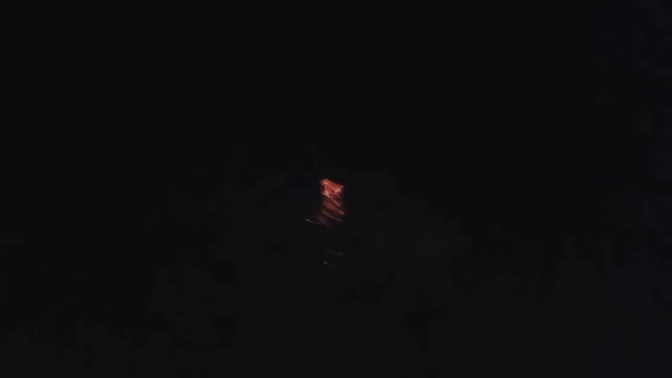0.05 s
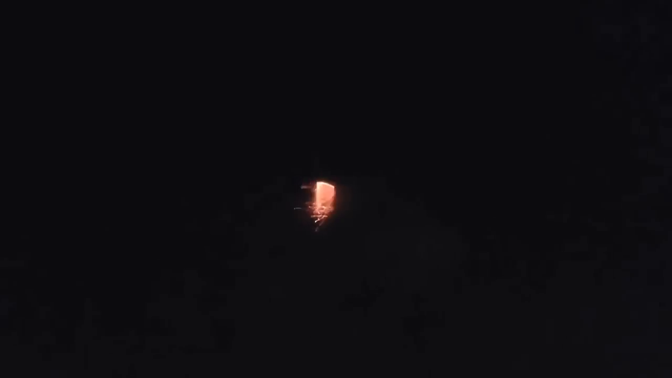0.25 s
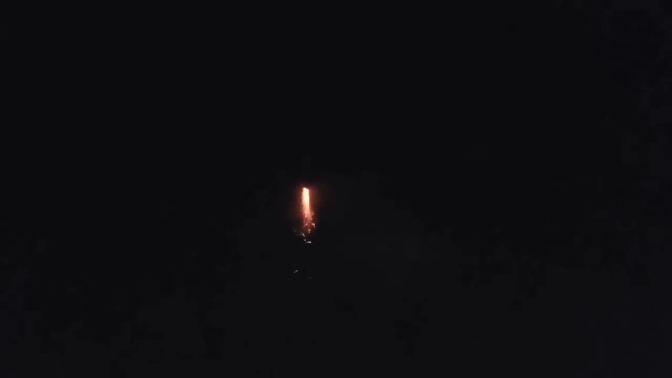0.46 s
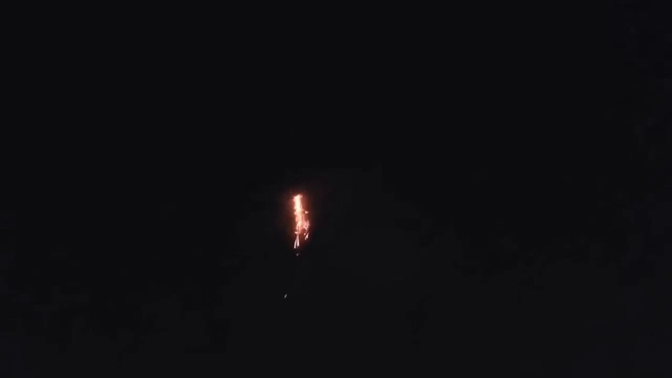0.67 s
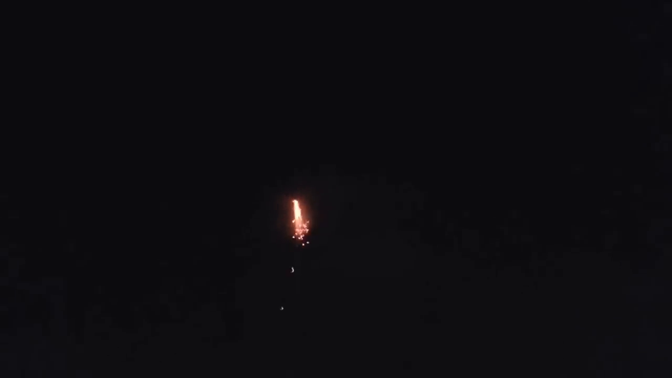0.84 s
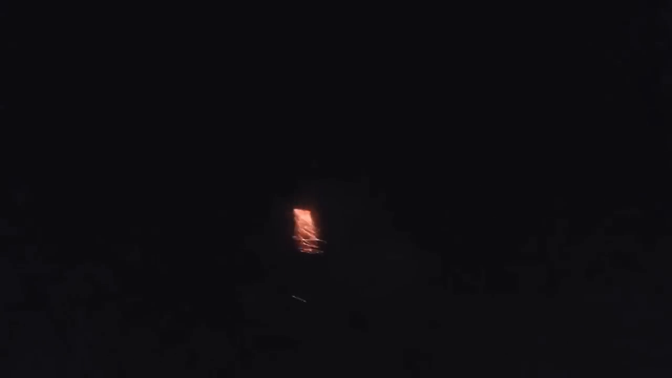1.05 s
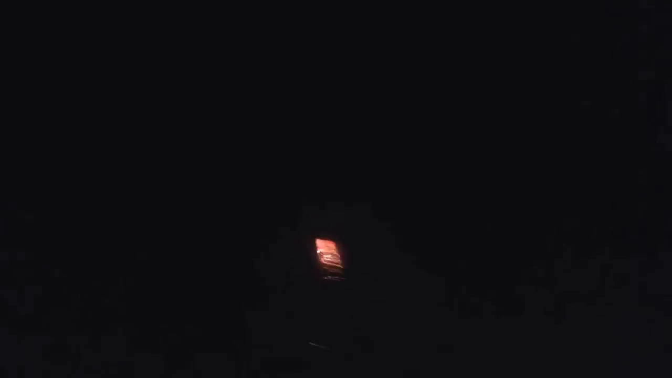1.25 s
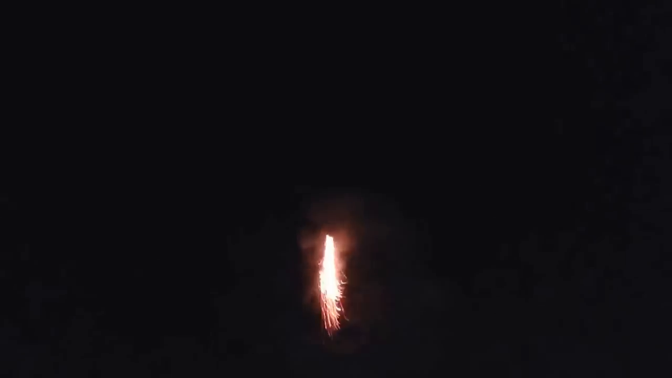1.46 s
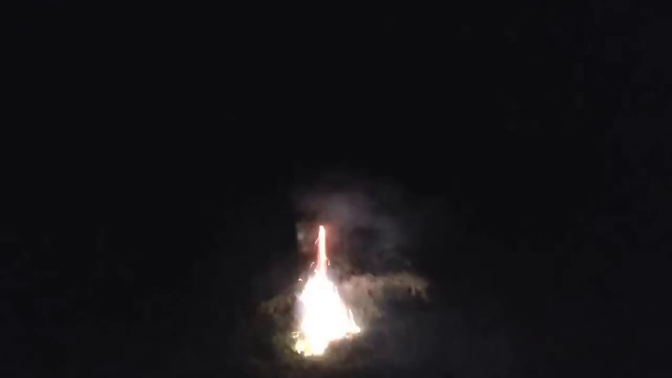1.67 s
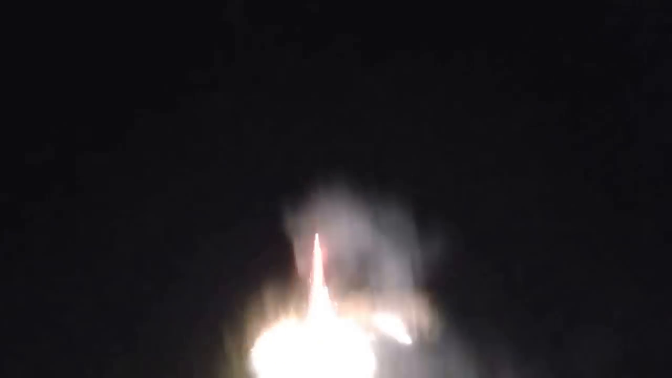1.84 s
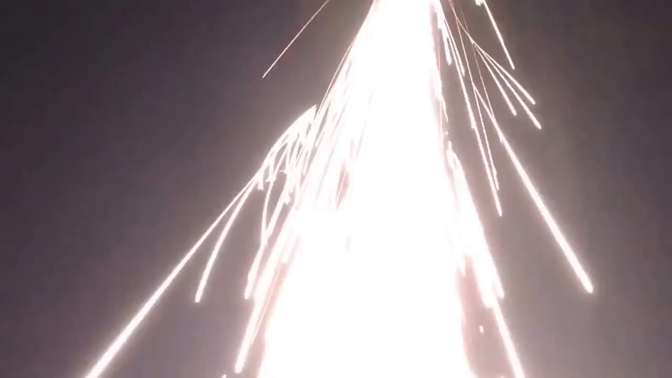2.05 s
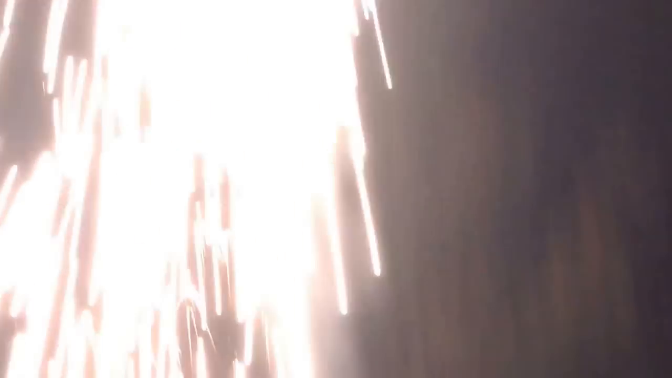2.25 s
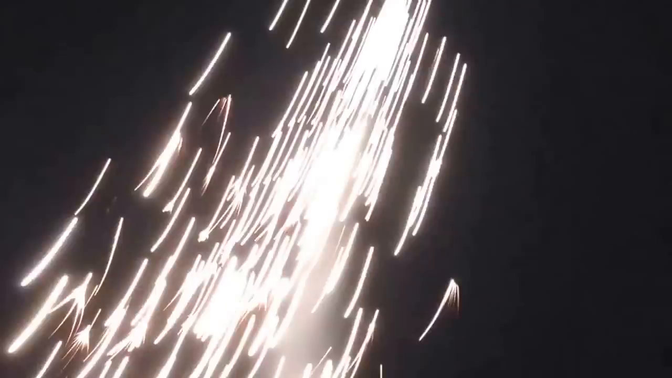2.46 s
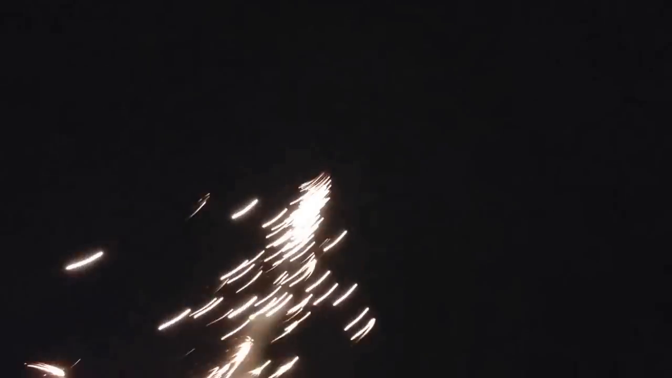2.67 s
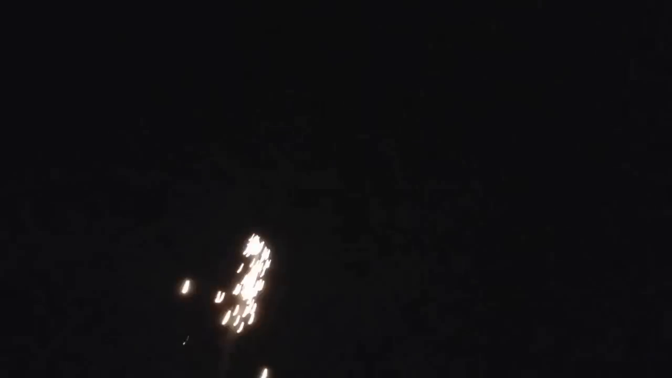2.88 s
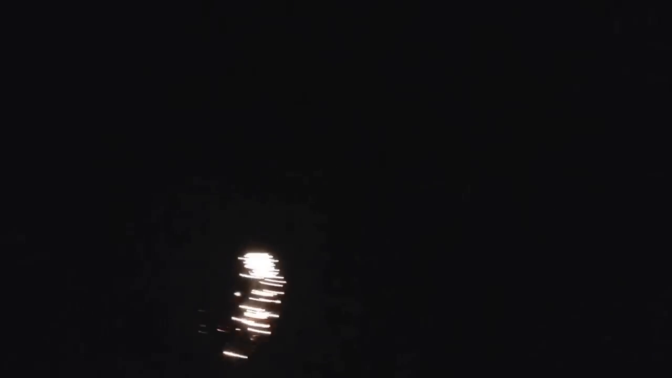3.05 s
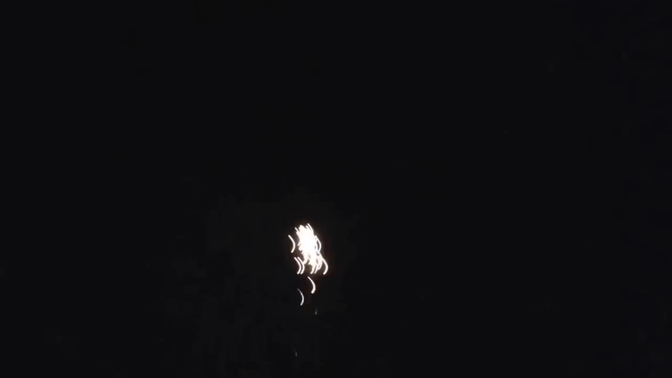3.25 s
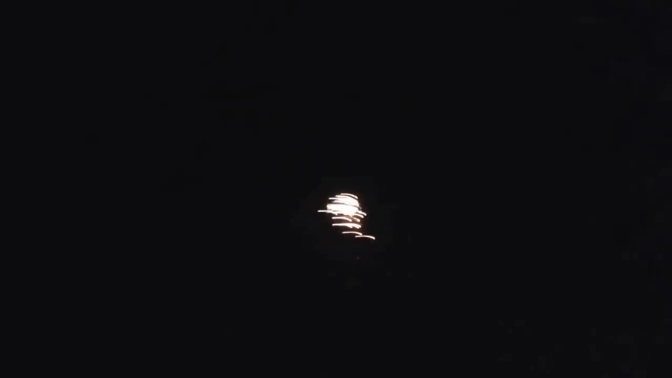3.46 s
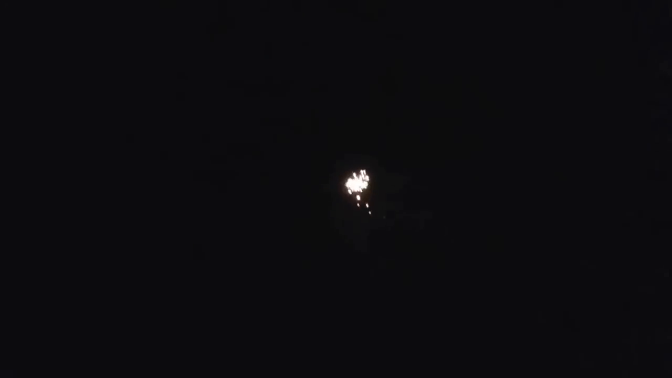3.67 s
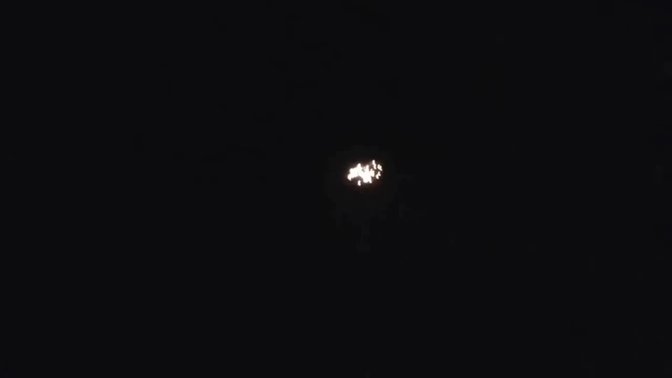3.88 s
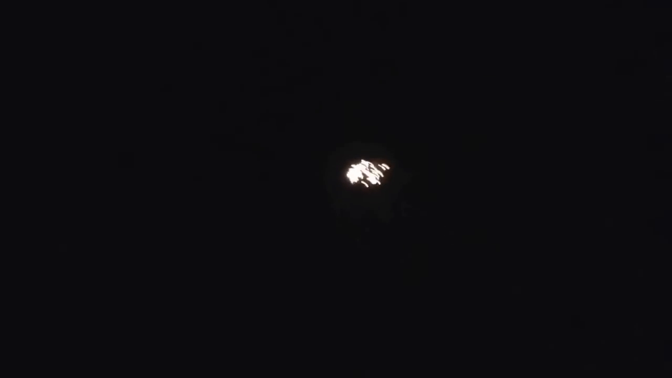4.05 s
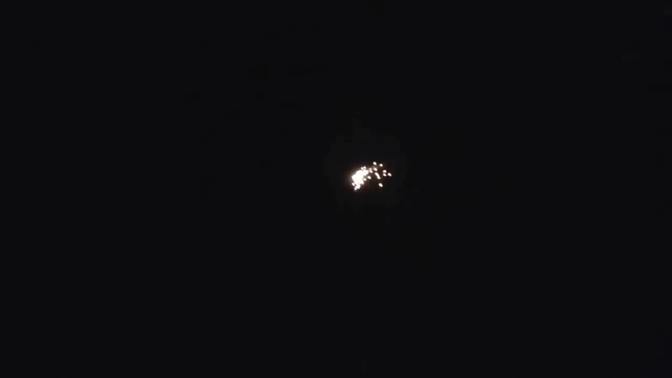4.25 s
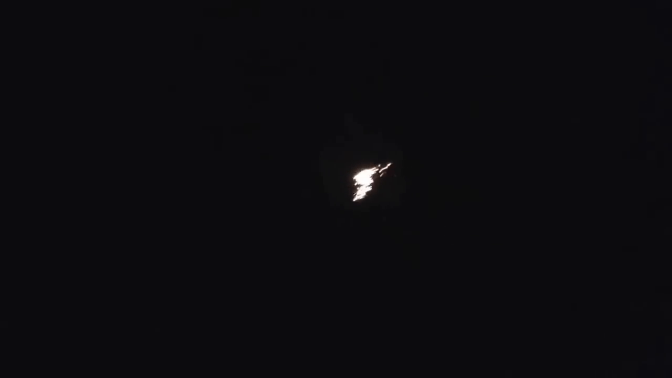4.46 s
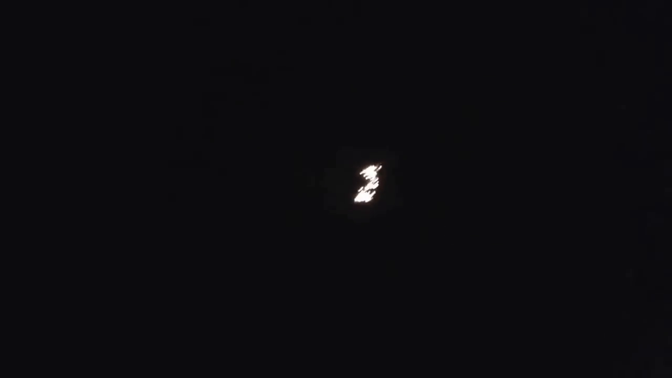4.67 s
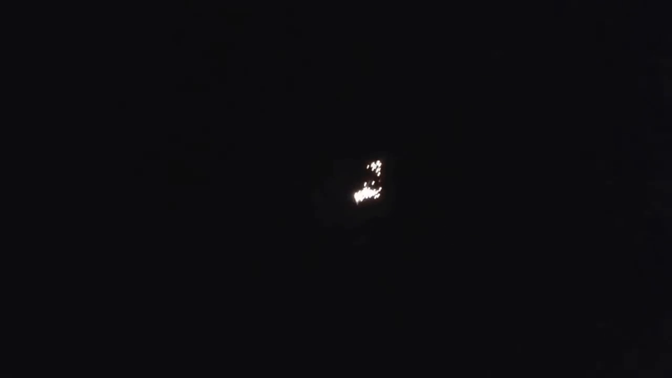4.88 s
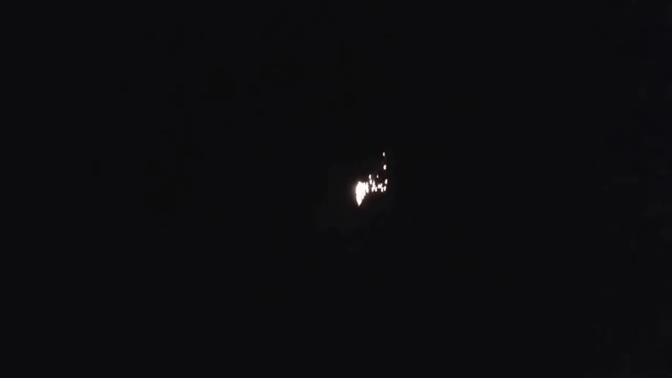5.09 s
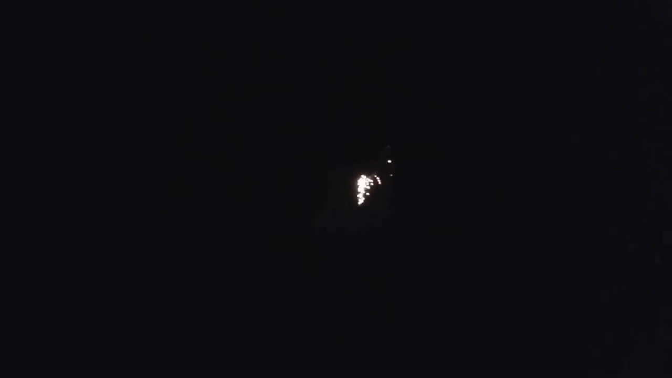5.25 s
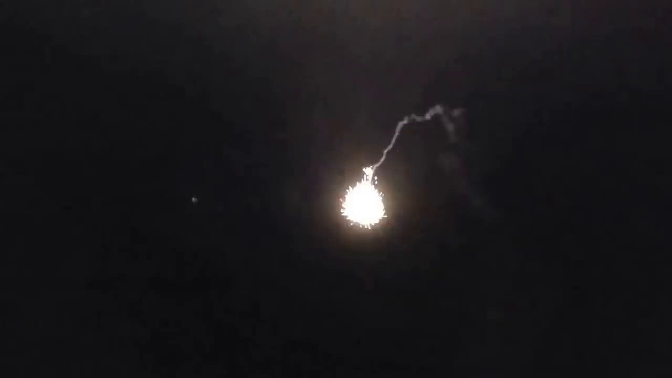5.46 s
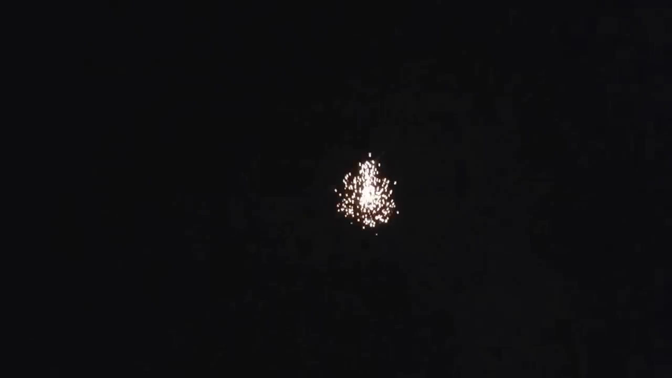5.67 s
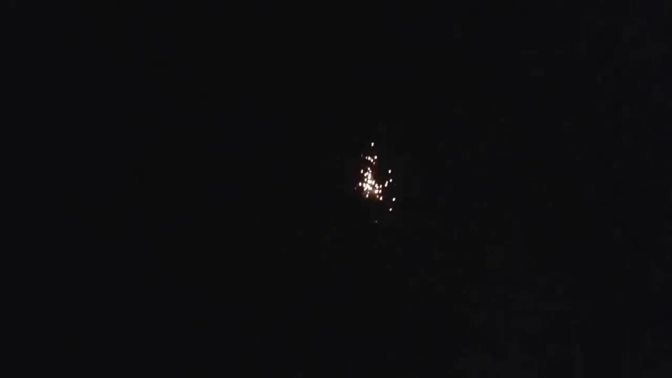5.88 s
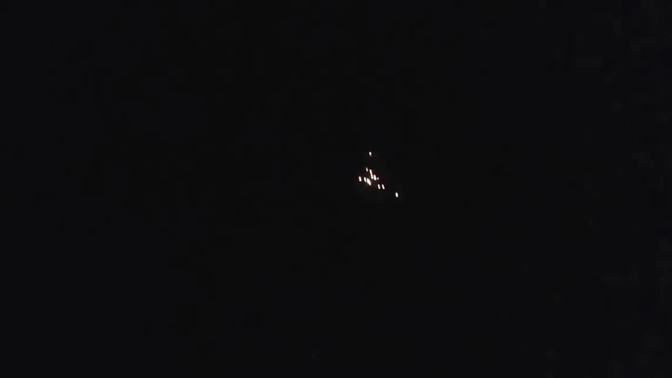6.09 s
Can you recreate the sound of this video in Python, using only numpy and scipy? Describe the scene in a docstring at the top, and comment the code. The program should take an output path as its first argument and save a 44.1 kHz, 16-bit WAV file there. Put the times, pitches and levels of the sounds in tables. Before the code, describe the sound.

At night a firework fuse fizzes softly, the rocket blasts off with a loud rushing hiss, its trail crackles away, and a sudden explosion booms.

```python
"""Firework rocket at night

A fuse hisses, a motor lights and roars away, its trail crackles, and high up the charge bursts,
with a ground echo and a rumble from the land around. Hiss, roar, sizzle and rumble are shaped
random spectra; pops and burst are short pressure waves. A small microphone and its recorder add
filter pre-ringing ahead of the burst, a dip, a limiter and a treble edge."""
import sys
import numpy as np
from scipy import signal
from scipy.io import wavfile
from scipy.ndimage import uniform_filter1d

SR = 44100
rng = np.random.default_rng(int(sys.argv[2]) if len(sys.argv) > 2 else 0)


def wav_record(signal):
    """Record a signal, one row per channel, as 16-bit PCM in the file named by sys.argv[1]."""
    frames = np.transpose(np.atleast_2d(signal))
    bounded = np.clip(frames, -1, 1)
    # unit amplitude maps onto the largest positive 16-bit level
    quanta = np.round(bounded * 32767).astype(np.int16)
    wavfile.write(sys.argv[1], SR, quanta)


N = 269892

# Spectrum of night air and microphone hiss. Each row: frequency in Hz, relative density in dB.
NIGHT_COLOUR = [(31, -27.5), (52, -6), (80, -3), (285, -9), (353, -9), (528, -9.5), (580, -4.5), (867, -7),
                (1890, -3), (5750, -14), (14800, -23)]
# Fuse level. Each row: time in seconds, hiss level in dB.
FUSE_LEVEL = [(0.0, -55), (0.088, -56.5), (0.12, -48), (0.416, -50), (0.448, -53), (0.694, -49.5),
              (0.782, -53), (0.892, -49), (0.992, -53.5), (1.09, -48.5), (1.142, -52), (1.43, -50)]
# Fuse spectrum. Each row: frequency in Hz, relative density in dB.
FUSE_COLOUR = [(150, -8), (400, -11.5), (1000, -16), (1700, -11), (3300, -6), (5000, -6.5), (9000, -6),
               (15500, -10)]
# Peaks and hollows of the fuse hiss, drifting as the flame creeps along.
# Each row: early centre in Hz, late centre in Hz, width in Hz, early gain in dB, late gain in dB.
FUSE_BANDS = [(760, 800, 300, 6, 5), (1200, 1450, 300, 3, 3), (2010, 2130, 350, 13, 15),
              (3950, 4250, 500, 8, 8), (4650, 4700, 350, 7, -2), (5300, 5450, 300, 3, 3),
              (5980, 6250, 400, 8, 8), (6650, 6700, 250, 5, -1), (7150, 7000, 600, -5, -4),
              (7800, 7900, 800, 5, 10), (9080, 8800, 400, -7, -5), (10100, 9600, 500, 4, 3),
              (10600, 10500, 600, -2, -6), (11800, 11700, 900, 2, 2)]
# Motor course. Each row: time in seconds, roar level in dB, treble tilt in dB per octave,
# share of the launch peaks from 0 to 1.
MOTOR_COURSE = [(1.25, -58.5, 2, 1), (1.32, -49, -4.5, 0.9), (1.47, -33.5, 0.5, 0.84), (1.64, -27, 1, 0.45),
                (1.72, -17.5, -0.14, 0.45), (1.768, -8, -1, 0.63), (1.82, -6, 1, 0.56), (1.85, -8, 0, 0.17),
                (1.95, -6.5, 2.5, 0.05), (2.02, -2, 0.5, 0), (2.1, -9, -2.5, .05), (2.194, -7, -1.5, 0.52),
                (2.246, -19, -3.5, 0), (2.312, -48, -1.5, 0.2), (2.45, -60, 3, 0)]
# Roar spectrum. Each row: frequency in Hz, relative density in dB.
ROAR_COLOUR = [(180, -51), (300, -28.5), (696, -15), (892, -13.5), (1240, -8.5), (1510, -9), (2140, -5),
               (7250, -10), (15500, -19)]
# Motor rumble spectrum. Each row: frequency in Hz, relative density in dB.
RUMBLE_COLOUR = [(40, -34.5), (80, -9.5), (150, 4), (300, 2.5), (500, -16), (900, -43)]
# Launch peaks of the roar at full share. Each row: centre in Hz, width in Hz, gain in dB.
LAUNCH_BANDS = [(780, 420, 16), (1687, 140, 3.5), (2120, 310, 15.5), (3600, 1100, 6), (4630, 1800, 3.5),
                (8500, 400, 3)]
# Spark trail. Each row: time in seconds, sizzle level in dB, small pops per second.
TRAIL_COURSE = [(2.3, -50, 420), (2.4, -54.5, 130), (2.45, -51.5, 600), (2.6, -47.5, 880), (2.66, -59, 200),
                (2.86, -72, 60), (3.1, -88, 34), (3.7, -85, 12), (4, -88, 2.8)]
# Sizzle spectrum. Each row: frequency in Hz, relative density in dB.
SIZZLE_COLOUR = [(59, -57), (100, -18.5), (253, 2.5), (897, -1), (1180, -5.5), (2320, -7), (2750, -12),
                 (10800, -18.5), (15500, -22)]
# Loud pops of single sparks. Each row: start in seconds, level in dB.
LOUD_POPS = [(2.326, -36), (2.3403, -37.5), (2.418, -37), (2.4729, -32), (2.476, -32), (2.4844, -41),
             (2.488, -37), (2.516, -41), (2.5478, -37), (2.5611, -37), (2.5707, -41), (2.5906, -37),
             (2.649, -30.5), (2.6559, -40), (2.6819, -38), (2.6882, -21.5), (2.6952, -24.5), (2.7012, -32),
             (2.7043, -32), (2.7262, -31), (2.741, -33), (2.7495, -33), (2.7538, -26.5), (2.7873, -30.5),
             (2.7931, -33), (2.8025, -32), (2.8196, -28.5), (2.8286, -32.5), (2.8328, -35), (2.8607, -36.5),
             (2.8634, -39), (2.9312, -35.5), (2.9413, -40), (2.979, -39), (2.983, -35.5), (3.026, -39.5),
             (3.0342, -42), (3.0602, -47), (3.0772, -38), (3.1985, -47), (3.2627, -44), (3.3243, -51),
             (3.3624, -42.5), (3.4065, -38), (3.527, -46), (3.544, -41), (3.575, -50)]
# Soft low thuds in the roar and among the sparks. Each row: centre in seconds, peak in dB, pitch in Hz.
THUDS = [(2.041, -32, 153), (2.114, -34, 114), (2.193, -36, 220), (2.591, -43, 260), (2.703, -37.5, 383),
         (3.052, -50, 230), (3.44, -52.5, 299.5)]
# Burst arrivals: direct, a near reflection, off the ground.
# Each row: start in seconds, thump level in dB, shock level in dB, thump decay in milliseconds.
BURST_ARRIVALS = [(5.7308, 9, -2, 6.0), (5.7334, -20, -9, 2), (5.7391, 11, -6, 5.8)]
# Burst echoes. Each row: time in seconds, rumble level in dB, rush level in dB.
ECHO_COURSE = [(5.748, -8, -21.5), (5.766, -25.5, -27.5), (5.79, -21, -33), (5.81, -32, -32.5),
               (5.85, -27, -42), (5.878, -35, -40.5), (5.892, -28.5, -42.5), (6.12, -40.5, -46)]
# Echo rush spectrum. Each row: frequency in Hz, relative density in dB.
ECHO_RUSH_COLOUR = [(290, -42.5), (500, -5), (686, -2.5), (2010, 0.5), (2720, -9.5), (4010, -13),
                    (5920, -21), (9780, -35), (15500, -48)]
# Echo rumble spectrum. Each row: frequency in Hz, relative density in dB.
ECHO_RUMBLE_COLOUR = [(29, -52.5), (50, -20), (73, -28), (178, 1.5), (235, -2.5), (328, -1), (498, -29.5),
                      (600, -22.5), (780, -28), (1320, -120)]
# Narrow dip in the response. Each row: time in seconds, centre in Hz, depth from 0 to 1.
DIP_COURSE = [(0, 2890, 0.87), (1.0, 2910, .92), (1.85, 2800, 1), (1.95, 2930, 0.37), (2.3, 2900, 0),
              (2.9, 2730, 1), (3.2, 2900, .75), (5.69, 2800, .62), (5.72, 2800, 0.08), (5.8, 2800, .6),
              (6.12, 2800, 0.47)]

NIGHT_DB = -60
LIFTOFF_S, CLEAR_S = 1.82, 0.022  # the rocket leaves the ground; how fast the rumble thins
GROUND_RUMBLE_DB, AIR_RUMBLE_DB = -25, -42.5  # relative to the roar
SMALL_DB, SMALL_FADE_DB_PER_S = -45.5, 9  # small pops grow fainter as the trail climbs
CLUMP_S, CLUMP_DB, CLUMP_PER_S = 0.0062, -25.5, 230  # extra sizzle and small pops around each loud pop
SPARK_MS, SPARK_SPREAD = 0.24, 0.28
EDGE_HZ = 15300

# short-time spectrum grid
FFT_SIZE, HOP = 1024, 256
BIN_HZ = np.fft.rfftfreq(FFT_SIZE, 1 / SR)[:, None]
FRAME_S = np.arange(N // HOP + 5) * HOP / SR
SAMPLE_S = np.arange(N) / SR


def gain_of(db):
    """Amplitude factor of a level in dB."""
    return 10 ** (np.asarray(db) / 20)


def evened(x, axis=None):
    """Scale to unit RMS."""
    return x / np.sqrt(np.mean(x ** 2, axis=axis) + 1e-20)


def read(points):
    """Spectrum in dB per bin, interpolated over log frequency."""
    hz, db = np.transpose(points)
    return np.interp(np.log(BIN_HZ + 1), np.log(hz + 1), db)


def follow(rows, t, outside=None):
    """Interpolate every column of a table over time."""
    s, *columns = np.transpose(rows)
    return [np.interp(t, s, column, outside, outside) for column in columns]


def band_db(hz, width_hz, db):
    """Resonance-shaped peak or hollow in dB."""
    return db / (1 + (2 * (BIN_HZ - hz) / width_hz) ** 2)


def tilt_octaves():
    """Octaves above 3 kHz, flattened in the bass."""
    return np.log2((BIN_HZ + 50) / 3000)


def hiss(colour_db, level_db, patchy_db, flicker_db):
    """Random short-time spectra with drifting patches and a flicker shared by all bands."""
    real, imag, patches = rng.standard_normal((len(FRAME_S), len(BIN_HZ), 3)).T
    patches = uniform_filter1d(patches, size=8, axis=0)  # over frequency
    patches = evened(uniform_filter1d(patches, size=10, axis=1))  # over time
    flicker = evened(uniform_filter1d(rng.standard_normal(len(FRAME_S)), size=2))
    colour = evened(gain_of(colour_db + 0 * FRAME_S), axis=0)
    spectra = (real + 1j * imag) * colour * gain_of(patchy_db * patches)
    wave = signal.istft(spectra, nperseg=FFT_SIZE, noverlap=FFT_SIZE - HOP)[1][:N]
    frame_db = level_db + flicker_db * flicker
    return evened(wave) * gain_of(np.interp(SAMPLE_S, FRAME_S, frame_db))


def shock(ms):
    """A sudden push of air, the suck after it and a small rebound; the air rounds the front."""
    u = np.arange(400) / SR * 1000 / ms
    push = np.cos(np.pi * u) + 0.7 * np.exp(-12 * u)
    return signal.lfilter([0.66], [1, -0.33], push * np.exp(-(u / 1.95) ** 2))


def night():
    """Steady faint hiss of night air and microphone."""
    return hiss(read(NIGHT_COLOUR), NIGHT_DB + 0 * FRAME_S, patchy_db=1.0, flicker_db=0.5)


def fuse():
    """Burning powder hisses out of the fuse until the motor takes over."""
    late = np.clip(FRAME_S / 1.1 - 0.1, 0, 1)
    colour_db = read(FUSE_COLOUR)
    for hz0, hz1, width_hz, db0, db1 in FUSE_BANDS:
        colour_db = colour_db + band_db(hz0 + late * (hz1 - hz0), width_hz, db0 + late * (db1 - db0))
    fade_db = 200 * np.maximum(FRAME_S - FUSE_LEVEL[-1][0], 0)
    level_db = follow(FUSE_LEVEL, FRAME_S)[0] - fade_db
    return hiss(colour_db, level_db, patchy_db=1.8, flicker_db=0.99)


def motor():
    """Turbulent jet: a roar with changing tilt and launch peaks, over a rumble that thins at lift-off."""
    roar_db, tilt_db, share = follow(MOTOR_COURSE, FRAME_S)
    burning = (FRAME_S > MOTOR_COURSE[0][0]) & (FRAME_S < MOTOR_COURSE[-1][0])
    roar_db = roar_db + np.where(burning, 0, -100)
    away = 1 / (1 + np.exp(-(FRAME_S - LIFTOFF_S) / CLEAR_S))
    rumble_db = roar_db + GROUND_RUMBLE_DB + away * (AIR_RUMBLE_DB - GROUND_RUMBLE_DB)
    peaks_db = share * sum(band_db(*row) for row in LAUNCH_BANDS)
    colour_db = read(ROAR_COLOUR) + tilt_db * tilt_octaves() + peaks_db
    roar = hiss(colour_db, roar_db, patchy_db=2.5, flicker_db=0.85)
    return roar + hiss(read(RUMBLE_COLOUR), rumble_db, patchy_db=1.9, flicker_db=3.0)


def thuds():
    """Soft low thuds: a few cycles of a cosine in a bell envelope, negative at the centre."""
    out, t = np.zeros(N), np.arange(-400, 400) / SR
    for s, db, hz in THUDS:
        wave = np.cos(2 * np.pi * hz * t) * np.exp(-(t * hz * 1.2) ** 2)
        out[round(s * SR) - 400:][:800] -= gain_of(db) * wave
    return out


def small_pops():
    """Sparks burst at random as tiny shocks, denser around the loud pops."""
    near = sum(np.exp(-((SAMPLE_S - s) / CLUMP_S) ** 2) for s, _ in LOUD_POPS)
    per_s = follow(TRAIL_COURSE, SAMPLE_S, 0)[1] + CLUMP_PER_S * np.minimum(near, 1)
    fires = rng.random(N) < per_s / SR
    size_db = 3.5 * np.minimum(rng.exponential(1, N), 3)
    level_db = SMALL_DB - SMALL_FADE_DB_PER_S * (SAMPLE_S - TRAIL_COURSE[0][0])
    return signal.oaconvolve(fires * gain_of(size_db + level_db), shock(0.28))[:N]


def loud_pops():
    """Single sparks burst as shocks of randomly varied length."""
    out = np.zeros(N)
    for (s, db), spread in zip(LOUD_POPS, rng.uniform(-1.1, 1, len(LOUD_POPS))):
        out[round(s * SR):][:400] += gain_of(db) * shock(SPARK_MS * (1 + SPARK_SPREAD * spread))
    return out


def scattered(pops):
    """Add scatter off the ground nearby as a decaying noise tail, then cut the bass."""
    taps = rng.standard_normal(900) * np.exp(-np.arange(900) / 150)
    scatter = signal.oaconvolve(pops, taps / np.linalg.norm(taps))[:N]
    high_pass = signal.butter(2, 180, "high", fs=SR, output="sos")
    return signal.sosfilt(high_pass, pops + gain_of(-15) * scatter)


def sizzle():
    """Hiss under the crackle, swelling around each loud pop; powers add."""
    power = gain_of(follow(TRAIL_COURSE, FRAME_S, -100)[0]) ** 2
    for s, db in LOUD_POPS:
        power = power + gain_of(db + CLUMP_DB) ** 2 * np.exp(-((FRAME_S - s) / CLUMP_S) ** 2)
    return hiss(read(SIZZLE_COLOUR), 10 * np.log10(power), patchy_db=1.532, flicker_db=2.5)


def trail():
    """Spark trail: small and loud pops with ground scatter, over a sizzle."""
    return scattered(small_pops() + loud_pops()) + sizzle()


def filter_prering():
    """Recorder filter pre-ringing ahead of the burst: a low swell and a thin ring near 2.8 kHz."""
    t = np.arange(2000) / SR  # seconds before the burst
    swell = np.cos(2 * np.pi * 172 * t) + 0.04 * np.sin(2 * np.pi * 344 * t)
    swell *= 1.3 * np.exp(-((t - 0.004) / 0.0033) ** 2)
    swell += 0.2 * np.exp(-((t - 0.012) / 0.005) ** 2) * np.cos(2 * np.pi * 175 * (t - 0.009))
    ring = sum(np.cos(2 * np.pi * (hz * t + rng.random())) for hz in np.linspace(2520, 3060, 9))
    ring = ring * np.exp(-t / 0.007) * np.clip((0.026 - t) / 0.008, 0, 1)
    return (gain_of(-21) * ring - swell)[::-1]


def burst():
    """Arrivals of a sharp shock and a fast-dying low thump; the recorder's filters ring ahead of the first."""
    out, t = np.zeros(N), np.arange(2000) / SR
    for s, thump_db, shock_db, decay_ms in BURST_ARRIVALS:
        at = round(s * SR)
        turn = 2 * np.pi * 195 * (t - 0.0005)
        thump = -(0.85 * np.cos(turn) + 0.17 * np.cos(3 * turn))
        thump *= np.exp(-(1000 * t / decay_ms) ** 2.1) * (1 - np.exp(-t / 0.00012))
        out[at:at + 2000] += gain_of(thump_db) * thump
        out[at:at + 400] += gain_of(shock_db) * shock(0.27)
    out[round(BURST_ARRIVALS[0][0] * SR) - 2000:][:2000] += filter_prering()
    return out


def echoes():
    """Ground, trees and walls scatter the burst back as rush and rumble, duller with distance."""
    burst_s = BURST_ARRIVALS[0][0]
    rumble_db, rush_db = follow(ECHO_COURSE, FRAME_S)
    # air absorbs treble on the longer paths
    tilt_db = 3.0 + 2.1 * np.exp(-np.maximum(FRAME_S - burst_s, 0) / 0.18)
    rush_colour_db = read(ECHO_RUSH_COLOUR) + tilt_db * tilt_octaves()
    rush = hiss(rush_colour_db, rush_db, patchy_db=1.5, flicker_db=1.2)
    rumble = hiss(read(ECHO_RUMBLE_COLOUR), rumble_db, patchy_db=0.8, flicker_db=1.2)
    since_s = SAMPLE_S - burst_s
    return rush * np.clip(since_s / 0.01, 0, 1) + rumble * np.clip(since_s / 0.03, 0, 1) ** 2


def scene():
    """All sources at one microphone, with the filter pre-ringing of the burst."""
    return (night() + fuse() + motor() + thuds() + trail() + burst() + echoes())[None]


def dipped(x):
    """Subtract a narrow wandering band; its filter rings briefly before and after each pop."""
    hz, depth = follow(DIP_COURSE, SAMPLE_S)
    hz = hz + 30 * evened(uniform_filter1d(rng.standard_normal(N), size=3000))
    turn = np.exp(2j * np.pi * np.cumsum(hz) / SR)
    ring = np.exp(-abs(np.arange(-1500, 1501)) / SR * np.pi * 380)
    # shift the band to 0 Hz, low-pass, shift back
    band = 2 * (turn * signal.oaconvolve(x / turn, ring / ring.sum(), "same")).real
    return x - np.clip(depth, 0, 1) * band


def limited(x):
    """Limiter: gain drops at once on peaks and recovers at 16 dB per second."""
    recovered_db = np.arange(N) * 16.0 / SR
    held_db = np.maximum.accumulate(20 * np.log10(abs(x) + 1e-9) + recovered_db) - recovered_db
    return x / gain_of(np.maximum(held_db + 0.18, 0))  # ceiling -0.18 dB


def record(dry):
    """Microphone chain: response dip, limiter, steep low-pass at the treble edge."""
    low_pass = signal.firwin(1023, EDGE_HZ, window=("kaiser", 9), fs=SR)
    return signal.oaconvolve(limited(dipped(dry[0])), low_pass, "same")[None]


dry = scene()
out = record(dry)
wav_record(out)
```